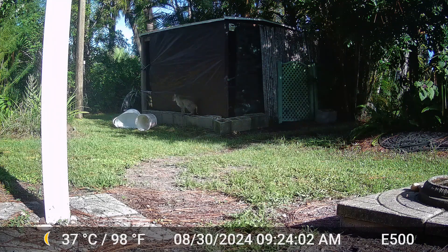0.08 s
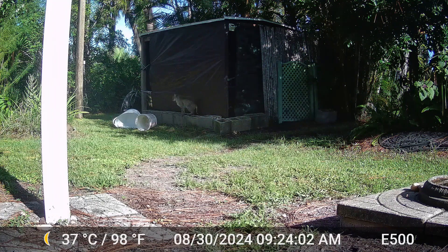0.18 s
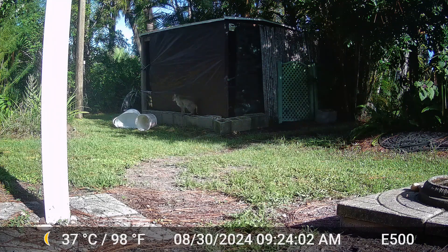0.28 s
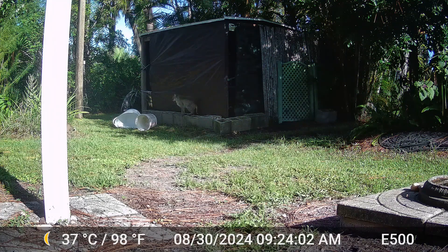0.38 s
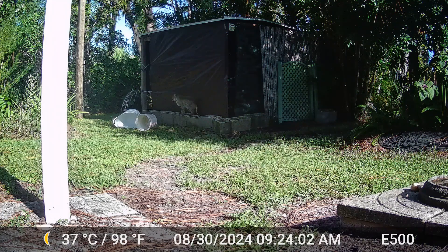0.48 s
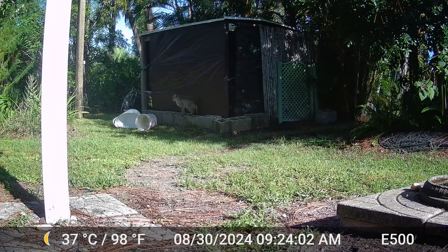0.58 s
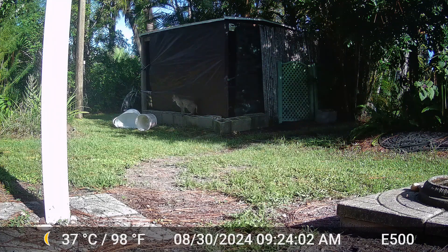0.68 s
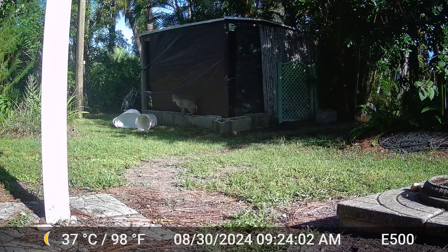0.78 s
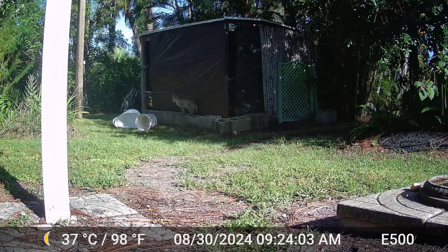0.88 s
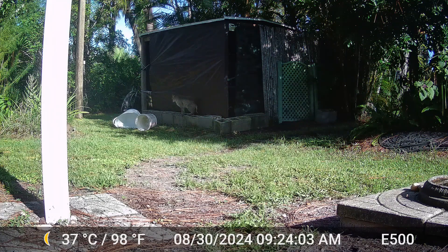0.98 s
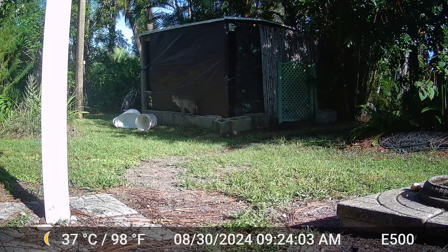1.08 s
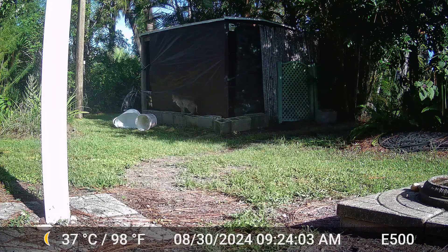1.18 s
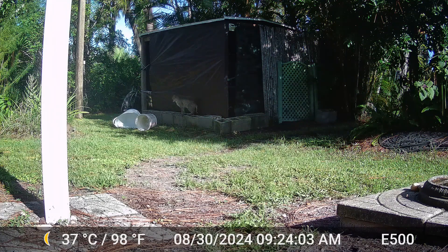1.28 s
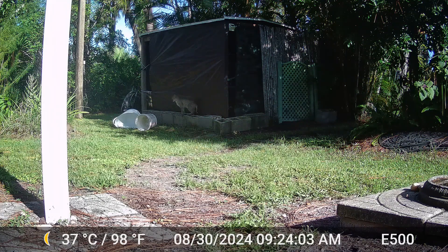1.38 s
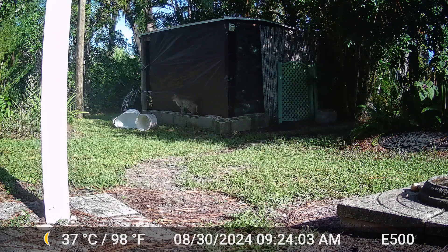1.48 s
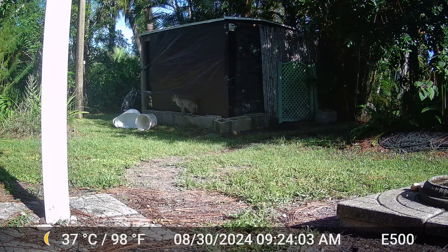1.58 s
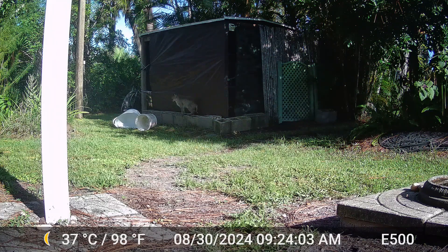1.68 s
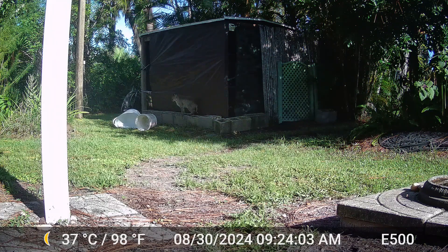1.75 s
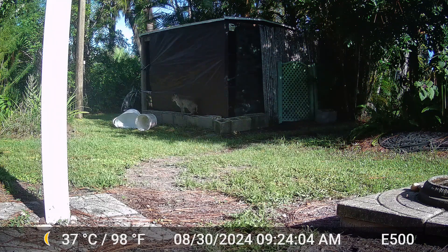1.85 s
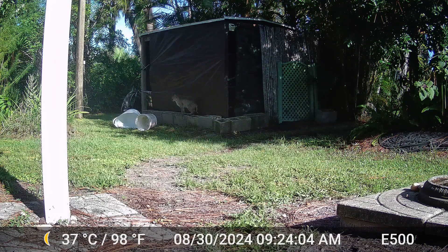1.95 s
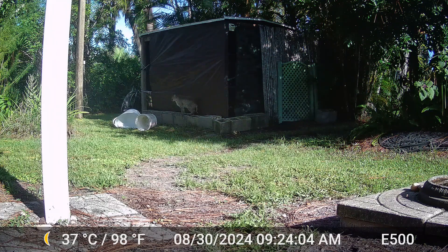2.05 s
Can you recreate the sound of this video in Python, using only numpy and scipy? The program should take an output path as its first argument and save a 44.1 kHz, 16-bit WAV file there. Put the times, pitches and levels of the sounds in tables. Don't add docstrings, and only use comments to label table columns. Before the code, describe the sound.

A low throbbing electrical hum from a camera, with one loud stutter and faint bucket knocks

```python
import sys
import numpy as np
from scipy import signal
from scipy.fft import rfft, irfft
from scipy.io import wavfile

SR = 44100
rng = np.random.default_rng(int(sys.argv[2]) if len(sys.argv) > 2 else 0)


def gain_from_db(level_db):
    decades = np.asarray(level_db, float) / 20
    return 10 ** decades


def materialize(psi):
    bounded = np.clip(np.atleast_2d(psi).T, -1, 1)
    quanta = np.round(bounded * 32767).astype(np.int16)
    wavfile.write(sys.argv[1], SR, quanta)


N = 92610
T_S = np.arange(N) / SR
FRAME_HZ = 30.005

BURST_STARTS_S = [
    .18,
    .2185,
    .3135,
    .623,
    1.073,
    1.205,
    1.324,
    1.775,
]
# tone level in dB, flurry level over tones in dB, flurry length in seconds.
BURST_SIZES = [
    (-49.5, -1, 0.022),
    (-45, -30, 0.0024),
    (-53, -19, 0.013),
    (-49.5, -2.5, 0.029),
    (-52, 1, 0.024),
    (-51.5, 4, 0.018),
    (-50.5, 0, 0.027),
    (-50, 0, 0.0212),
]


def ring(x, hz, width_hz):
    r = np.exp(-np.pi * width_hz / SR)
    b = np.array([1, 0, -1]) * (1 - r * r) / 2
    a = [1, -2 * r * np.cos(2 * np.pi * hz / SR), r * r]
    return signal.lfilter(b, a, x)


def gate(start_s, length_s, edge_s=0.00067):
    since_s = T_S - start_s
    return np.clip(np.minimum(since_s, length_s - since_s) / edge_s, 0, 1)


def steady(hz, width_hz, rough):
    v = ring(rng.standard_normal(N), hz, width_hz)
    return v / (np.abs(signal.hilbert(v)) + rough * v.std()) * (1 + rough)


def sag(times_s, steps, edge_hz, order=1):
    coupling_hz, coupling_q = 89, 0.84
    at = np.asarray(times_s) * SR
    inside = (at >= 0) & (at < N - 1)
    at, steps = at[inside], np.asarray(steps)[inside]
    i = at.astype(int)
    early = np.bincount(i, steps * (1 + i - at), N)
    late = np.bincount(i + 1, steps * (at - i), N)
    load = np.cumsum(early + late)
    r = np.exp(-2 * np.pi * edge_hz / SR)
    for _ in range(order):
        load = signal.lfilter([1 - r], [1, -r], load)
    w = 2 * np.pi * coupling_hz
    b, a = signal.bilinear([1, 0, 0], [1, w / coupling_q, w * w], SR)
    return signal.lfilter(b, a, load)


def chatter(steps_per_s, level, edge_hz):
    i = np.flatnonzero(rng.random(N) < steps_per_s / SR)
    size = (level * rng.standard_normal(N))[i]
    return sag(i / SR, size, edge_hz)


def frame_throb():
    # time into the frame in ms, signed step of line voltage.
    frame_steps = [(2.6, -0.0022), (6.7, -0.018), (7.45, 0.00076), (7.9, -0.027), (9.6, -0.0098),
                   (13.25, -0.029), (14.5, 0.031), (14.95, 0.041), (20.6, -0.0014), (23.5, 0.0042),
                   (26.8, -0.028), (27.2, 0.024)]
    jitter_ms, spread_db = 0.02, 1.3
    soft_edge_hz, sharp_edge_hz, sharp_share = 933, 3000, 0.27
    ms, step = np.transpose(frame_steps)
    frame_count = int(N / SR * FRAME_HZ) + 1
    early_late, strong_weak = rng.standard_normal((2, frame_count, len(ms)))
    frame_start_s = np.arange(frame_count)[:, None] / FRAME_HZ
    times_s = (frame_start_s + (ms + jitter_ms * early_late) / 1000).ravel()
    steps = (step * gain_from_db(spread_db * strong_weak)).ravel()
    soft = sag(times_s, steps, soft_edge_hz, order=2)
    sharp = sag(times_s, steps, sharp_edge_hz)
    return (1 - sharp_share) * soft + sharp_share * sharp


def converter_whine():
    # pitch in Hz, width in Hz, level in dB.
    whine_tones = [(5185, 120, -67.5), (10750, 350, -78.5)]
    start_ms, length_ms = 26.5, 12
    in_frame_ms = T_S * FRAME_HZ % 1 / FRAME_HZ * 1000
    since_ms = (in_frame_ms - start_ms) % (1000 / FRAME_HZ)
    on = np.clip(np.minimum(since_ms, length_ms - since_ms), 0, 1)
    return on * sum(gain_from_db(db) * steady(hz, width_hz, rough=0.59) for hz, width_hz, db in whine_tones)


def idle_chatter():
    return chatter(steps_per_s=250, level=gain_from_db(-43.5), edge_hz=2550)


def yard_air():
    # frequency in Hz, density in dB per Hz.
    yard_spectrum = [(30, 2), (60, 4), (130, -7.5), (300, -14), (620, -19), (1200, -34), (5000, -39.5),
                     (15000, -62.5)]
    hz, db = np.transpose(yard_spectrum)
    bin_hz = np.arange(N // 2 + 1) * SR / N
    shape = gain_from_db(np.interp(np.log(bin_hz + 1), np.log(hz), db, left=-30))
    v = irfft(shape * rfft(rng.standard_normal(N)), N)
    return gain_from_db(-42) * v / v.std()


def heavy_frame_thuds():
    # crest in seconds, size in line voltage.
    heavy_frames = [(.015, 0.029), (.282, 0.017), (0.349, 0.01), (0.416, 0.017), (.482, 0.022),
                    (0.713, 0.014), (.748, 0.048), (0.781, 0.049), (0.816, 0.027), (0.849, 0.014),
                    (0.883, 0.022), (0.949, 0.027), (1.014, 0.012), (1.213, 0.024), (1.246, 0.046),
                    (1.282, 0.022), (1.315, 0.05), (1.35, .013), (1.383, 0.035), (1.483, 0.031),
                    (1.517, 0.032), (1.982, .014), (2.048, 0.011), (2.08, 0.018)]
    thud_hz, width_s, offset = 63.5, 0.012, 0.43
    out = 0
    for crest_s, size in heavy_frames:
        from_crest_s = T_S - crest_s
        swing = np.cos(2 * np.pi * thud_hz * from_crest_s) + offset
        out = out + size * np.exp(-np.abs(from_crest_s) / width_s) * swing
    return out


def bucket_knocks():
    # start in seconds, level in dB, pitch in Hz, 60 dB decay in seconds.
    knocks = [
        (.118, -38.5, 117, 0.27),
        (.64, -44, 460.5, 0.16),
        (.975, -40.5, 573, 0.064),
        (1.106, -30, 616, .04),
        (1.44, -44.5, 614, 0.056),
        (1.775, -47.5, 767, 0.13),
    ]
    rise_s = 0.0052
    out = 0
    for start_s, db, hz, t60_s in knocks:
        t = np.clip(T_S - start_s, 0, None)
        decay = gain_from_db(db - 60 * t / t60_s)
        out = out + decay * t / (t + rise_s) * np.sin(2 * np.pi * hz * t) * 3
    return out


def burst_tones():
    # pitch in Hz, width in Hz, level in dB, delay in seconds, length in seconds.
    clock_tones = [(4600, 86, 0, 0.00012, 0.0029), (11340, 70, -17, .0001, 0.0043),
                   (3080, 160, -7.5, 0.0034, 0.022), (4570, 1200, -11.5, 0.0037, 0.014),
                   (8050, 450, -29, 0.005, 0.0071)]
    out = 0
    for hz, width_hz, tone_db, delay_s, length_s in clock_tones:
        envelope = 0
        for start_s, (db, _, flurry_s) in zip(BURST_STARTS_S, BURST_SIZES):
            envelope = envelope + gain_from_db(db + tone_db) * gate(start_s + delay_s, min(length_s, flurry_s))
        out = out + steady(hz, width_hz, rough=width_hz / 600) * envelope
    return out


def busy_flurries():
    # start in seconds, length in seconds.
    around_write = [
        (.214, .06),
        (.286, .044),
    ]
    head_s, trim_db = 0.0038, 1.5
    level = gain_from_db(-33) * gate(0.226, 0.027)
    for start_s, length_s in around_write:
        level = level + gain_from_db(-42) * gate(start_s, length_s)
    for start_s, (db, flurry_db, length_s) in zip(BURST_STARTS_S, BURST_SIZES):
        level = level + gain_from_db(db + flurry_db + trim_db) * gate(start_s + head_s, length_s)
    return chatter(steps_per_s=2700, level=level, edge_hz=2800)


def memory_write():
    # first sag in seconds, list of recoveries in seconds; it sags again after all but the last.
    write_blocks = [
        (.22597, [.22802, .23016, .23231]),
        (.23802, [.24003, .24214]),
        (.24481, [.24685, .24892]),
    ]
    sag_size, gap_s = 0.61, 0.00007
    sag_edge_hz, sag_snap_share = 1785, 0.039
    recovery_edge_hz, recovery_snap_share, snap_hz = 3020, 0.22, 16000
    dip_hz, dip_width_hz, dip_share = 8070, 1300, 0.54
    down_s, up_s = [], []
    for first_s, recoveries_s in write_blocks:
        down_s += [first_s, *(np.array(recoveries_s[:-1]) + gap_s)]
        up_s += recoveries_s
    one = np.ones(len(up_s))
    rise = (1 - recovery_snap_share) * sag(up_s, one, recovery_edge_hz, order=2)
    rise = rise + recovery_snap_share * sag(up_s, one, snap_hz)
    fall = (1 - sag_snap_share) * sag(down_s, one, sag_edge_hz, order=2)
    fall = fall + sag_snap_share * sag(down_s, one, snap_hz)
    line = sag_size * (rise - fall)
    return line - dip_share * ring(line, dip_hz, dip_width_hz)


def data_buzz():
    # multiple of the buzz pitch, level in dB.
    buzz_orders = [(1, -54), (2, -52), (3, -65), (4, -64), (4.5, -68), (5, -66), (7, -73)]
    buzz_hz = 1790
    buzz = sum(gain_from_db(db) * np.sin(2 * np.pi * k * buzz_hz * T_S) for k, db in buzz_orders)
    return gate(0.2978, 0.0095) * buzz


def bucket_roll():
    hz, width_hz = 596, 164
    v = ring(ring(rng.standard_normal(N), hz, width_hz), hz, width_hz)
    return gain_from_db(-52.5) * gate(1.18, 0.32, edge_s=0.048) * v / v.std()


def scene():
    supply = frame_throb() + converter_whine() + idle_chatter() + heavy_frame_thuds()
    data = burst_tones() + busy_flurries() + memory_write() + data_buzz()
    far_yard = yard_air() + bucket_knocks() + bucket_roll()
    return (supply + data + far_yard)[None]


def top_cut(x):
    return signal.sosfilt(signal.butter(12, 16450, fs=SR, output="sos"), x)


def record(dry):
    bass_cut = signal.butter(1, 13, "high", fs=SR, output="sos")
    treble_cut = signal.butter(4, 14400, fs=SR, output="sos")
    x = signal.sosfilt(bass_cut, dry)
    x = signal.sosfiltfilt(treble_cut, x)
    return top_cut(x)


dry = scene()
out = record(dry)
materialize(out)
```